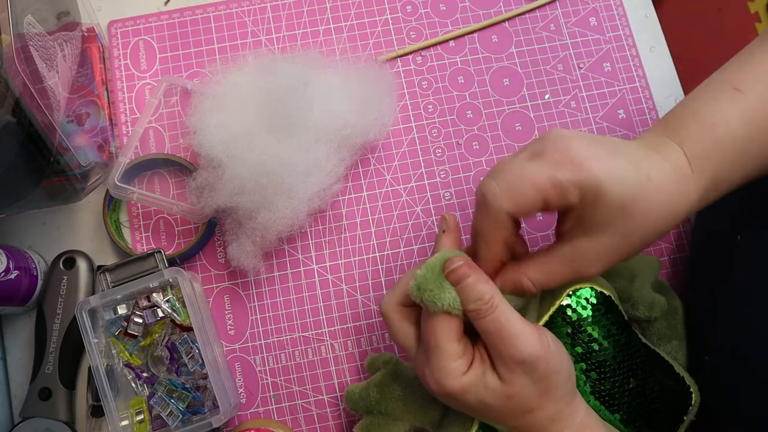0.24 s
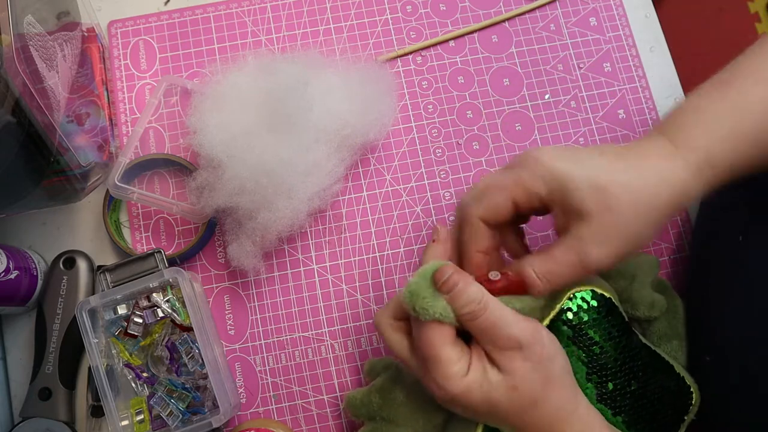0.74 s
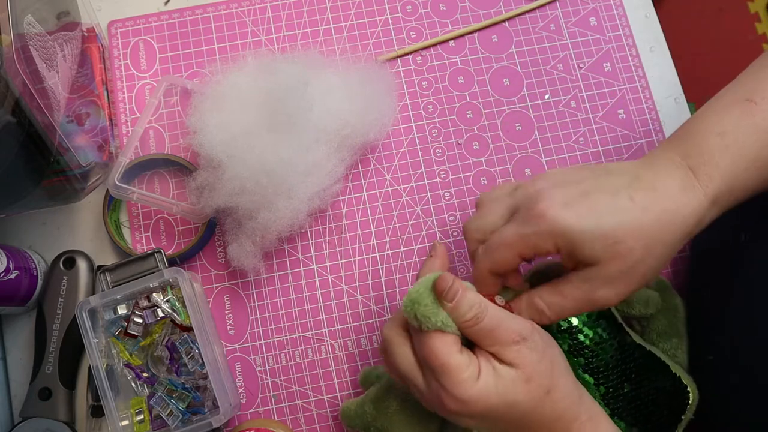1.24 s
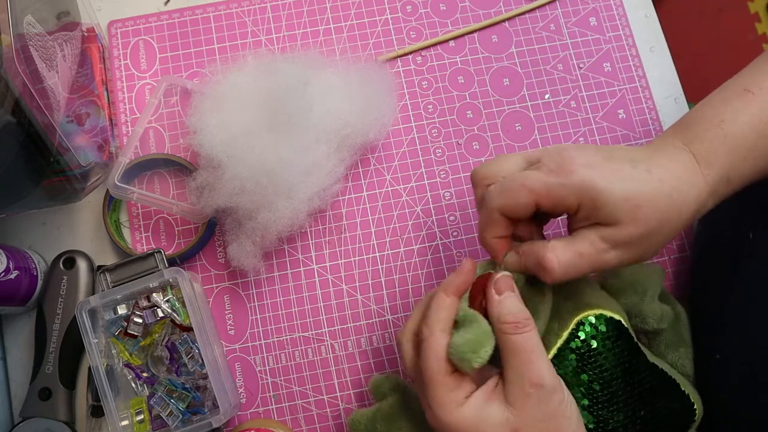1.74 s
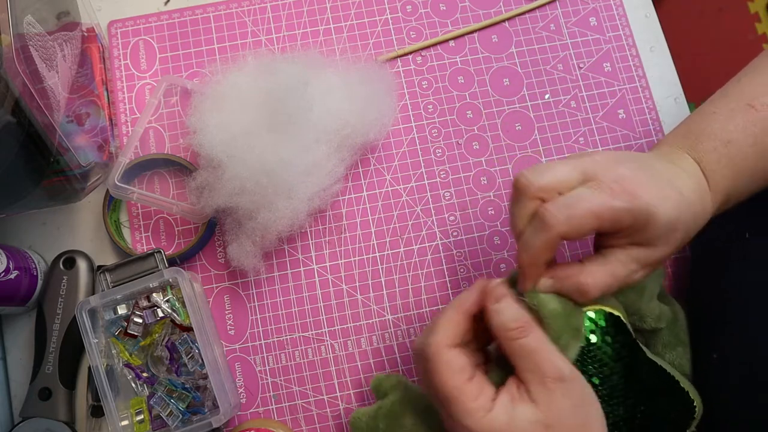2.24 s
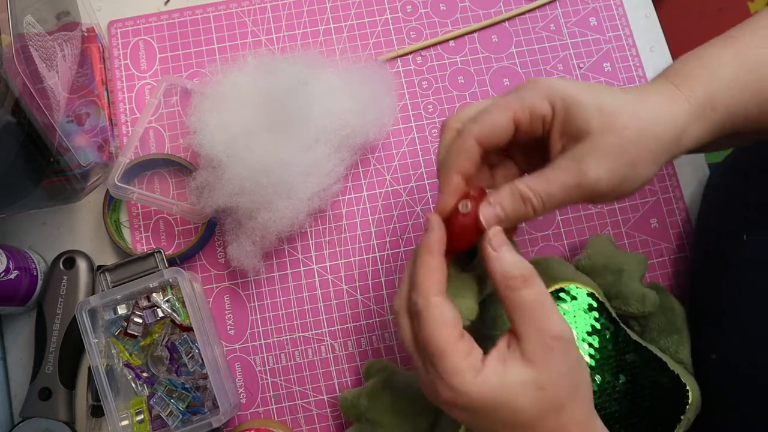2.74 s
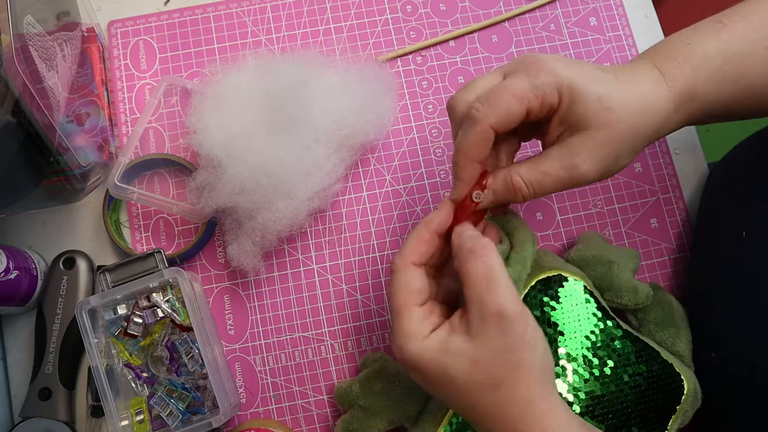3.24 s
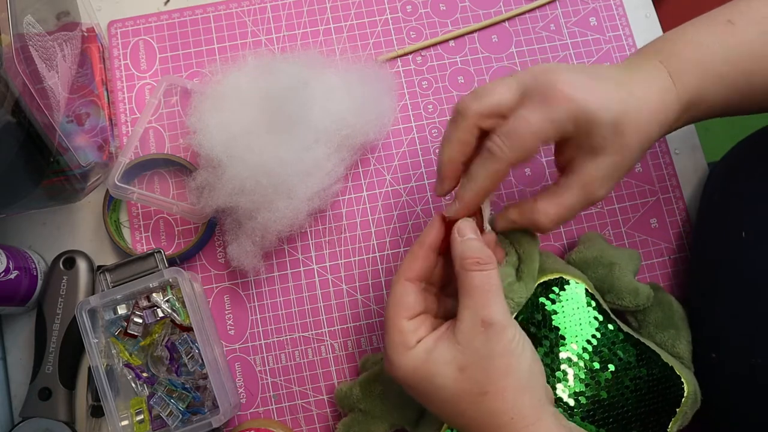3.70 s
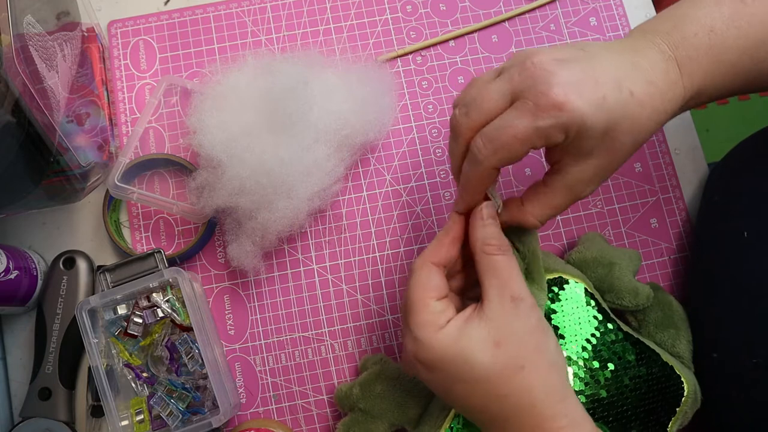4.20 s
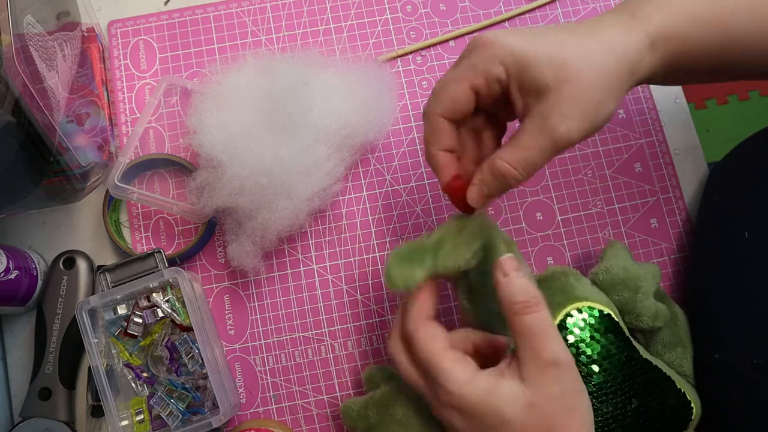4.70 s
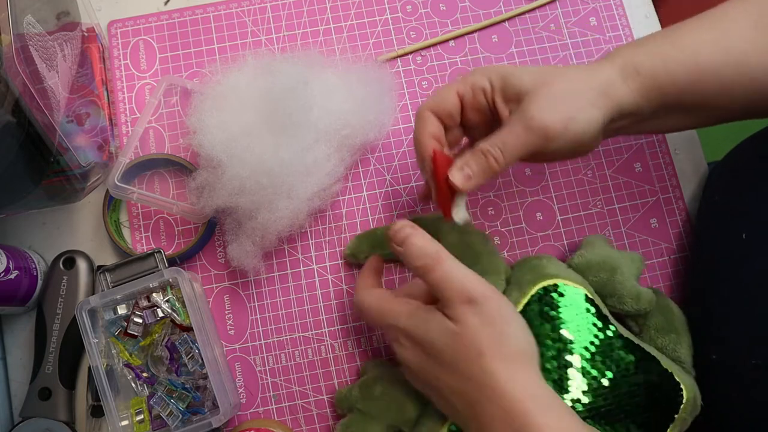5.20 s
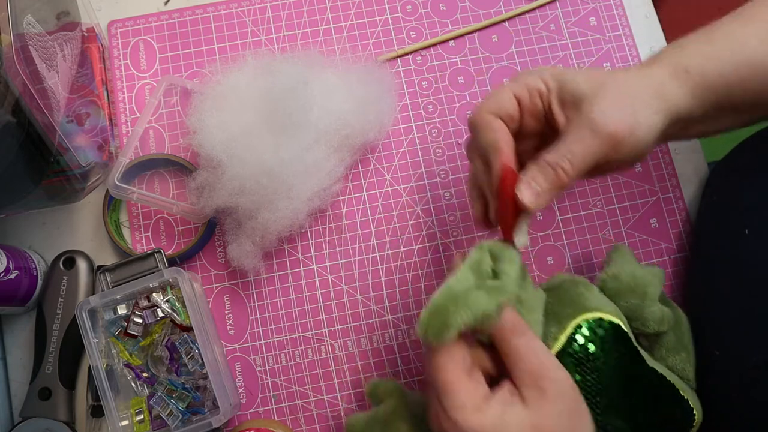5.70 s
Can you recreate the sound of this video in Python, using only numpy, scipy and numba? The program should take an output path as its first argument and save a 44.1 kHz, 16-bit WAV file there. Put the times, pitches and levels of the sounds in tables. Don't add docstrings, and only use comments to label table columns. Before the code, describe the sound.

Brief high chirps from a squeezed toy squeaker, with soft fabric rubbing, small nail clicks and dull knocks above a constant low ventilation drone.

```python
import sys
import numpy as np
from scipy import signal
from scipy.fft import rfft, irfft, next_fast_len
from scipy.io import wavfile
from scipy.ndimage import uniform_filter1d
from numba import njit

SR = 44100
rng = np.random.default_rng(int(sys.argv[2]) if len(sys.argv) > 2 else 0)


def waveform_to_disk(signal):
    frames = np.transpose(np.atleast_2d(signal))
    scaled = np.clip(frames, -1, 1) * 32767
    samples = np.round(scaled).astype(np.int16)
    wavfile.write(sys.argv[1], SR, samples)


def gain_from_decibels(decibels):
    exponent = np.asarray(decibels, float) / 20
    return 10 ** exponent


N = 262395


def level(x, db):
    return x * gain_from_decibels(db) / np.sqrt(np.mean(x ** 2))


def ring(f, hz, width):
    return 1 / (1 + 1j * (f / hz - hz / f) * hz / width)


def filtered(x, response):
    size = next_fast_len(len(x) + 4096)
    f = np.arange(size // 2 + 1) * SR / size + 1e-3
    return irfft(rfft(x, size) * response(f), size)[:len(x)]


def walk(rate, size):
    hold = max(int(SR / rate), 1)
    steps = np.repeat(rng.standard_normal(size // hold + 1), hold)
    return 1.3 * uniform_filter1d(uniform_filter1d(steps, hold), hold)[:size]


# frequency_hz, density_db (per Hz)
RUSH_SPECTRUM = [(12, -76.5), (20, -32), (32, -34), (60, -16.5), (81, -23), (104, -9), (123, -2), (216, -9),
                 (248, -8), (277, -14), (513, -22), (802, -35.5), (1090, -33.5), (3160, -46),
                 (16000, -55.5)]
# frequency_hz, width_hz, boost_db (over the broad rush)
DUCT_MODES = [(127, 16, 6.5), (241.4, 25, 3.5), (72.6, 14, 6.5)]
VENT_DB = -32


def vent():
    hz, db = np.transpose(RUSH_SPECTRUM)

    def duct(f):
        rush_gain = gain_from_decibels(np.interp(np.log(f), np.log(hz), db))
        return rush_gain * (1 + sum((gain_from_decibels(boost) - 1) * abs(ring(f, c, w)) ** 2 for c, w, boost in DUCT_MODES))

    rush = filtered(rng.standard_normal(N), duct)
    return level(rush * gain_from_decibels(0.28 * walk(0.91, N)), VENT_DB)


# frequency_hz, width_hz
FIBRE_BANDS = [(900, 810), (2400, 2400), (4700, 5300), (8000, 3100)]
RESTING_DB = (-58.5, -68, -70.5, -72.5)
RUB_BAND_DB = (-0.5, -0.5, -3, -0.5)
# peak_s, time_s (to swell or fade 10 dB), level_db, tilt_db_per_octave
RUB_STROKES = [(0.229, -0.1, -65, -7), (0.334, 0.5, -60, -3), (0.601, .04, -44, -10),
               (0.634, .022, -38, -4.5), (0.778, 0.03, -41.5, -4), (0.858, 0.1, -55.5, -4),
               (0.978, .05, -51.5, -1), (1.372, 0.3, -59.5, -1.5), (1.46, 0.12, -50, -3),
               (1.766, 0.06, -58, -0.5), (1.988, .08, -53, -3), (2.382, -0.33, -54.5, -4.5),
               (2.547, -0.2, -56, -2.5), (2.699, -0.54, -61.5, -3.5), (2.87, -0.33, -58, -2),
               (3.108, 0, -63, -4.5), (3.3, 0.06, -52, -2.5), (3.631, -0.1, -54.5, -1),
               (4.148, 0, -59.5, -1.5), (4.198, 0.13, -64, -2), (4.255, 0.1, -56, -2.5),
               (4.575, 0, -59, -7), (5.114, 0.35, -63, -11), (5.172, 0.11, -53, -3),
               (5.383, 0.07, -47.5, -5), (5.493, 0.1, -51, -5.5), (5.754, 0.23, -57, -3.5),
               (5.824, 0.02, -48.5, -14), (5.859, 0.12, -55.5, -1), (5.939, .05, -54, -4.5)]
# centre_s, half_length_s, level_db, ring_hz
BULB_SCRAPES = [(0.497, .05, -53, 2200), (0.786, .02, -53, 2700), (0.981, .04, -54, 2900),
                (1.431, .045, -57, 2500), (1.534, .0051, -48, 11200), (3.261, .04, -51, 7300),
                (3.643, .018, -48, 2600), (3.636, .02, -47, 4700), (3.631, .025, -50, 6500),
                (4.291, .05, -60, 8200), (4.533, .025, -56, 2500), (4.531, .025, -61, 8000),
                (5.171, .03, -58, 8000), (5.161, .025, -59, 3800)]
SCRAPE_WIDTH = 0.37


def cloth():
    t, out = np.arange(N) / SR, 0
    stroke_powers = [gain_from_decibels(-20 * abs(t - s) / abs(length)) for s, length, *_ in RUB_STROKES]
    for (hz, width), rest_db, band_db in zip(FIBRE_BANDS, RESTING_DB, RUB_BAND_DB):
        grains = rng.standard_normal(N) * gain_from_decibels(2.6 * rng.exponential(size=N))
        grains = grains * gain_from_decibels(2.5 * walk(60, N))
        octave = np.log2(hz / 1000)
        power = gain_from_decibels(2 * rest_db)
        for stroke, (*_, db, tilt) in zip(stroke_powers, RUB_STROKES):
            power = power + stroke * gain_from_decibels(2 * (db + tilt * octave + band_db))
        out = out + np.sqrt(power) * level(filtered(grains, lambda f: ring(f, hz, width) ** 2), 0)
    scrape_grains = grains[::-1]
    for s, length, db, hz in BULB_SCRAPES:
        near = abs(t - s) < .15
        rung = filtered(scrape_grains[near], lambda f: ring(f, hz, SCRAPE_WIDTH * hz) ** 2)
        out[near] += level(rung, db) * np.exp(-((t[near] - s) / length) ** 2)
    return out


# time_s (re slap), level_db
WIND_UP_SWING = [(-.003, -23), (-.0006, -9), (0, 0)]
# centre_s, length_s, low_db, tube_db
ALTERNATE_FLAPS = (2.058, .005, -14, 3)
# frequency_hz, width_hz
SIDE_BRANCH = (11100, 900)
SHUT_TUBE_DB = -25
TUBE_HZ_PER_OCTAVE = -1100
UPPER_PER_EFFORT = 0.4
JITTER, SHIMMER_DB = .002, 2.5
GLIDE_HISS_DB = 6
PUFF = .045


def squeak(rows, slope_db, purity, bulb_hz, hiss_db, rest_hz, width, upper_hz, upper_rel_db, polarity):
    s, *columns = np.transpose(rows)
    before, wind_db = np.transpose(WIND_UP_SWING)
    t = np.arange(N) / SR
    live = (t > s[0] + before[0]) & (t < s[-1] + .006)
    t = t[live]
    since_slap = t - s[0]
    hz, effort_db, mouth_db = (np.interp(t, s, c) for c in columns)
    low_db = effort_db + np.interp(since_slap, before, wind_db)
    tube_db = mouth_db + np.interp(since_slap, before[1:], (SHUT_TUBE_DB, 0))
    upper_db = tube_db + upper_rel_db + UPPER_PER_EFFORT * (effort_db + 16)
    tube_hz = rest_hz + TUBE_HZ_PER_OCTAVE * np.log2(hz / 1050)
    phase = 2 * np.pi * np.cumsum(hz * (1 + JITTER * walk(600, len(t)))) / SR

    k = np.arange(1, 37)[:, None] / 2
    f = k * hz
    whole = k % 1 == 0
    at, length, half_low_db, half_tube_db = ALTERNATE_FLAPS
    half = (k % 1 > 0) * np.exp(-((t - at) / length) ** 4)

    opening_db = np.interp(since_slap, before[1:], (20, 0))
    soft = gain_from_decibels((k == 1) * (purity * np.maximum(-9.5 - low_db, 0) + opening_db))
    bulb = 1 / (1 + 1j * f / bulb_hz) ** 2 / (1 + (f / bulb_hz) ** 8)
    low = soft * gain_from_decibels(slope_db * np.log2(k)) * bulb
    shapes = (low * (whole + gain_from_decibels(half_low_db) * half),
              ring(f, tube_hz, width) ** 3 * (whole + gain_from_decibels(half_tube_db) * half),
              -ring(f, upper_hz, 2400) ** 2 * (whole + half))
    gains = (1, polarity * gain_from_decibels(tube_db), polarity * gain_from_decibels(upper_db))
    partials = sum(g * a / np.sqrt(np.sum(abs(a) ** 2, axis=0) / 2) for g, a in zip(gains, shapes))
    partials *= 1 - .9 * ring(f, *SIDE_BRANCH)
    partials *= gain_from_decibels(SHIMMER_DB * np.array([walk(170, len(t)) for _ in k]))
    audible = f < .45 * SR
    tone = np.real(np.sum(partials * audible * np.exp(1j * k * phase), axis=0))

    def tube_colour(g):
        return (.3 * ring(g, 2500, 3500) + ring(g, np.mean(tube_hz), 1.4 * width) ** 2
                + .7 * ring(g, upper_hz, 3000) ** 2)

    air = filtered(rng.standard_normal(len(t)) * (1 + np.cos(phase)), tube_colour)
    slide = uniform_filter1d(abs(np.gradient(np.log(hz))) * SR, 130)
    air = level(air, hiss_db) * gain_from_decibels(GLIDE_HISS_DB * np.tanh(slide / 20))
    air = air * gain_from_decibels(tube_db - mouth_db / 2 + 0.57 * (low_db + 14.5))
    gate = np.clip((t - t[0]) / .002, 0, 1) * np.exp(-np.maximum(t - s[-1], 0) / .0015)
    out = np.zeros(N)
    out[live] = gain_from_decibels(low_db) * gate * (PUFF + tone + air)
    return out


# time_s, pitch_hz, effort_db, mouth_db
THUMB_SQUEEZES = [
    [(0.0512, 1096, -11, 0.5), (0.055, 1063, -12.5, 1), (0.059, 1022, -18.5, 4), (0.064, 985, -20, 1),
     (0.0685, 969, -23, 4), (0.075, 862, -42, -6)],
    [(2.0209, 1035, -11, -4), (2.025, 1048, -10, -2), (2.029, 1050, -14, -1), (2.033, 996, -18, 3),
     (2.037, 915, -23, 2), (2.045, 801, -40, -2)],
    [(2.9174, 980, -11, -3), (2.923, 996, -13, 0), (2.928, 1042, -14, -2), (2.933, 1059, -14.5, -2),
     (2.939, 1021, -15, -1), (2.943, 911.5, -18.5, -3), (2.948, 868, -25.5, -1), (2.959, 800, -43, -1)],
]
# time_s, pitch_hz, effort_db, mouth_db
BULB_GASP = [(2.054, 2354, -9, -6), (2.06, 2250, -10.5, -1.5), (2.063, 1827, -16, 1),
             (2.066, 1613, -13.5, -4), (2.07, 1544, -10.5, -8), (2.074, 1271, -17.5, -1)]
# time_s, pitch_hz, effort_db, mouth_db
BULB_REFILL = [(2.085, 1147, -17, -4.5), (2.101, 1079, -23, 2.5), (2.111, 1018, -25.5, -2.5),
               (2.123, 1003, -21.5, -2.5), (2.145, 1055, -17, -1), (2.152, 1125, -13.5, -4),
               (2.159, 1255, -12.5, -2), (2.1684, 1117, -17.5, -2), (2.172, 1020, -25.5, -3)]
# slope_db_per_octave, purity_db_per_db (when soft), bulb_cutoff_hz, hiss_db
REED_SETTINGS = [
    (-4, -0.1, 7200, -8),
    (0, 0.2, 6500, -11.5),
    (-1, 0.65, 5100, -10),
    (-1.5, 0.2, 9300, -11.5),
]
# tube_hz, width_hz, upper_hz, upper_db (re tube), polarity
TUBE_MODES = [
    (9280, 1800, 12500, -1.5, 0.79),
    (8300, 3600, 12600, -7, -1.3),
    (9620, 2140, 12700, -8.5, 0.99),
    (8700, 4700, 12100, -5, -0.8),
]


def squeaks():
    first, second, last = THUMB_SQUEEZES
    breaths = (first, second, BULB_GASP + BULB_REFILL, last)
    reed = sum(squeak(rows, *make, *tube) for rows, make, tube in zip(breaths, REED_SETTINGS, TUBE_MODES))
    return reed / phone_gain(reed, 0.)


# start_s, peak_db, ring_hz, crack_db
NAIL_TICKS = [(0.2259, -30.5, 2100, -22), (0.3232, -38.5, 1590, -20), (0.5875, -33, 1150, -28),
              (0.611, -24.5, 1430, -9), (0.6272, -24.5, 1050, -29), (0.6334, -32, 2330, -10.5),
              (0.6381, -18, 1390, -29), (0.6431, -33, 1750, -26), (0.769, -34.5, 958, -19),
              (0.7944, -43, 1160, -21), (0.847, -38, 1010, -25), (1.5324, -44, 902, -20),
              (1.8841, -38.5, 969, -5), (2.5121, -38, 1140, -21), (2.6946, -37.5, 950, -20),
              (3.1422, -36, 2170, -3), (3.298, -35, 1060, -23), (3.3158, -37.5, 1076, -25),
              (4.2537, -37.5, 1110, -17), (4.4737, -35.5, 1050, -21.5), (4.6474, -44, 1530, -20.5),
              (5.3903, -30.5, 918, -13), (5.499, -37, 1114, -8), (5.5192, -41, 1080, -23)]
# start_s, peak_db, ring_hz, crack_db
DULL_THUDS = [(0.097, -29, 1110, -30), (0.11, -30, 1040, -30), (0.225, -35.5, 520, -30),
              (0.572, -33.5, 507, -30), (3.239, -36, 630, -30.5), (4.561, -35, 622, -32),
              (5.372, -20.5, 518, -30), (5.868, -29.5, 533, -30.5)]
# start_s, peak_db, ring_hz, crack_db
BRIGHT_SNAPS = [(2.3433, -43, 2240, -21), (2.4195, -42.5, 3800, 1), (3.1072, -42, 2580, -19),
                (4.2541, -39.5, 4400, -8), (4.4742, -43, 2900, -18), (4.5344, -46, 2300, -15),
                (5.189, -42.5, 2330, -16), (5.3716, -33.5, 2810, -19)]
TICK_T60_S, THUD_T60_S, SNAP_T60_S = 0.009, 0.02, 0.011


def ticks():
    out, t = np.zeros(N + 2000), np.arange(2000) / SR
    kinds = ((NAIL_TICKS, TICK_T60_S), (DULL_THUDS, THUD_T60_S), (BRIGHT_SNAPS, SNAP_T60_S))
    hits = [(*row, t60) for table, t60 in kinds for row in table]
    for s, db, hz, crack_db, t60 in hits:
        noise = rng.standard_normal(2000)
        decay = np.exp(-np.log(1000) * t / t60)
        crack = level(filtered(noise, lambda f: ring(f, 7500, 5000) ** 2), crack_db)
        rough = level(filtered(noise, lambda f: ring(f, 1.2 * hz, 1.2 * hz) ** 2), 0)
        body = np.sin(2 * np.pi * hz * t) + .8 * rough
        start = int(s * SR)
        out[start:start + 2000] += gain_from_decibels(db) * decay * (body + crack)
    return out[:N]


# delay_s, level_db
TABLE_REFLECTIONS = [(.0006, -27.5), (.0017, -21), (.0031, -17.5)]
NEAR_T60_S, NEAR_DB = .05, -10
ROOM_T60_S, ROOM_DB, ROOM_LOW_HZ, ROOM_HIGH_HZ = 0.15, -20.5, 1200, 7000
ROOM_TOP_HZ = 13200


def room(x):
    t = np.arange(int(.5 * SR)) / SR
    decays = ((NEAR_DB, NEAR_T60_S), (ROOM_DB, ROOM_T60_S))
    tail = sum(gain_from_decibels(db) * np.exp(-np.log(1000) * t / t60) for db, t60 in decays)

    def absorption(f):
        treble_loss = 1 / (1 + 1j * f / ROOM_HIGH_HZ) / (1 + (f / ROOM_TOP_HZ) ** 8)
        return treble_loss / (1 - 1j * ROOM_LOW_HZ / f)

    response = 0.041 * filtered(rng.standard_normal(len(t)) * tail, absorption)
    response[0] += 1
    for lag, db in TABLE_REFLECTIONS:
        response[int(lag * SR)] += gain_from_decibels(db)
    return signal.fftconvolve(x, response)[:N]


@njit
def gain_control(x, top, power, attack, release, feedback):
    e, g, gain = 0., 1., np.empty(len(x))
    for i in range(len(x)):
        y = abs(x[i]) * g ** feedback
        e += (y - e) * (attack if y > e else release)
        g = min(top / (e + 1e-9), 1.) ** power
        gain[i] = g
    return gain


GAIN_TOP_DB, GAIN_POWER, GAIN_ATTACK_S, GAIN_RELEASE_S = -22.5, 0.66, 0.0012, 0.023


def phone_gain(x, feedback):
    attack, release = 1 / (GAIN_ATTACK_S * SR), 1 / (GAIN_RELEASE_S * SR)
    return gain_control(x, gain_from_decibels(GAIN_TOP_DB), GAIN_POWER, attack, release, feedback)


def scene():
    struck_and_blown = room(squeaks() + ticks())
    return (struck_and_blown + cloth() + vent())[None]


def roll_off(x):
    return signal.sosfilt(signal.butter(12, 16470, fs=SR, output="sos"), x)


CLIP = .8
TOP_HZ = 15800


def record(dry):
    x = np.clip(dry * phone_gain(dry[0], 0.95), -CLIP, CLIP)
    x = signal.sosfilt(signal.ellip(8, .2, 70, TOP_HZ, fs=SR, output="sos"), x)
    return roll_off(x)


dry = scene()
out = record(dry)
waveform_to_disk(out)
```